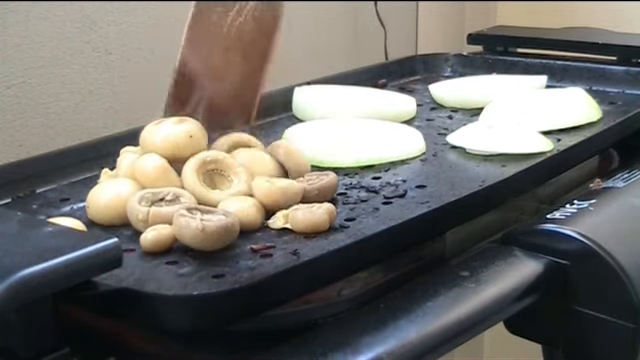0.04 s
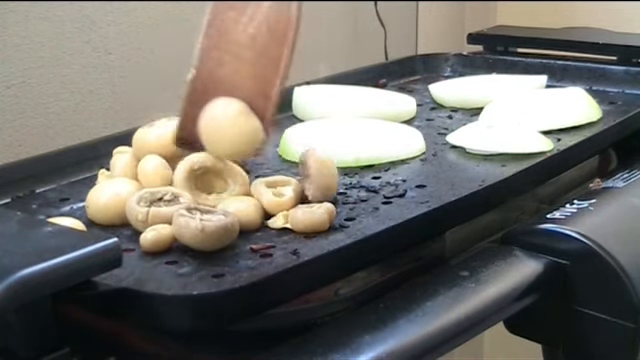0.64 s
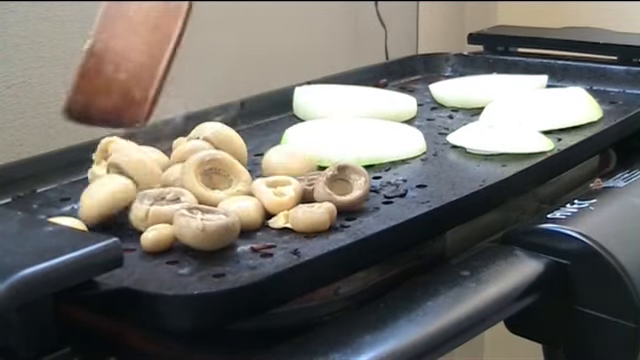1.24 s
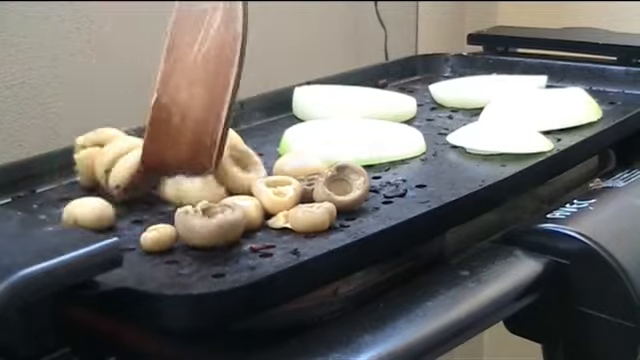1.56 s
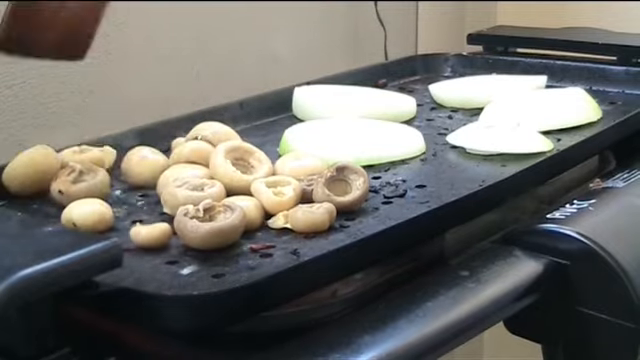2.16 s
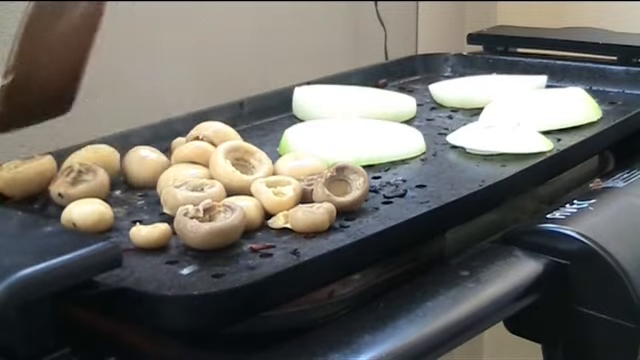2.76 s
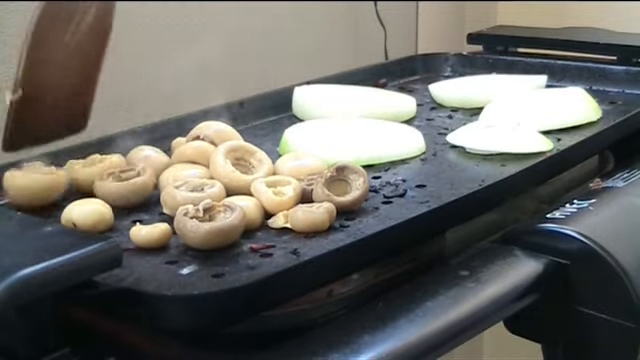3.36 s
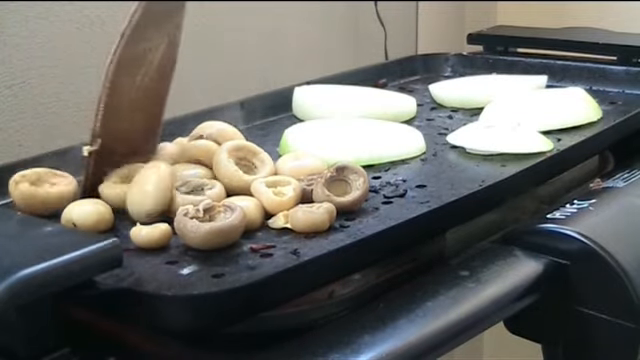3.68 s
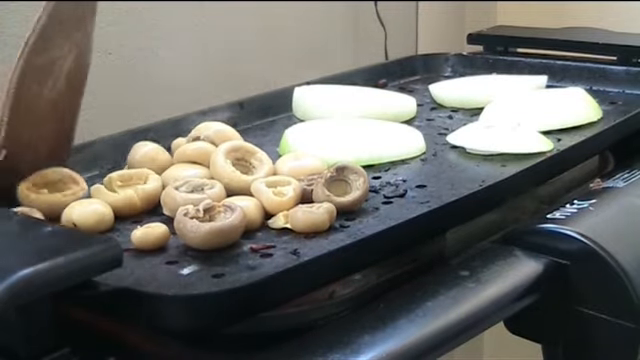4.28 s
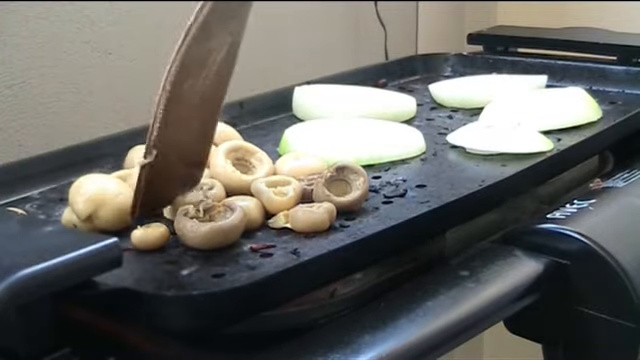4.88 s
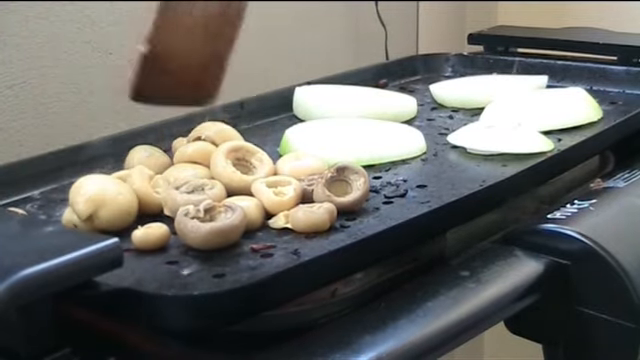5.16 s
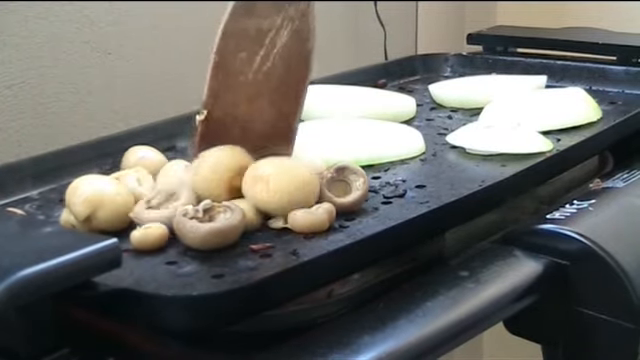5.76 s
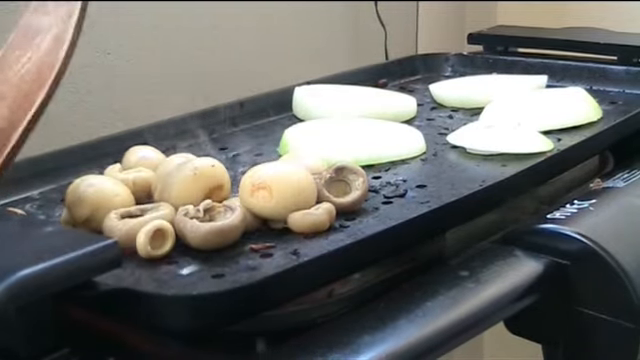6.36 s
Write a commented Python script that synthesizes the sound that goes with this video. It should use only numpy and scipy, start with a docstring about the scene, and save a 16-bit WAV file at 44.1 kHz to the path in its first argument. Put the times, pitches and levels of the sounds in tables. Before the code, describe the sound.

A wooden spatula bumps and shifts frying mushrooms, setting off steamy hisses, brief squeals and tiny pops over a steady sizzle.

```python
"""Mushrooms on the griddle

Mushrooms fry on an electric griddle in a humming kitchen while a wooden spatula pushes them about.
Tiny bubbles keep the juice sizzling. Where a wet face meets hot metal, steam spurts out and makes
the flesh flutter and squeal. The spatula knocks dully on the plate, drops pop, and toward the end
one trapped drop chirrs and spits."""
import sys
import numpy as np
from scipy import signal
from scipy.fft import rfft, irfft
from scipy.io import wavfile

SR = 44100
rng = np.random.default_rng(int(sys.argv[2]) if len(sys.argv) > 2 else 0)


def wav_out(sig):
    """Save sig, one row per channel (or a flat mono array), as 16-bit PCM at SR to the path in sys.argv[1]."""
    wavfile.write(sys.argv[1], SR, np.round(np.clip(np.atleast_2d(sig).T, -1, 1) * 32767).astype(np.int16))


N = 287840
TIME = np.arange(N) / SR
CUTOFF_HZ = 15850
USUAL_SQUEAL_DB = -20  # louder squeals turn brighter, softer ones duller


def from_db(db):
    """Decibels to gain."""
    return 10 ** (np.asarray(db) / 20)


def unit_power(x):
    """Scale to a power of 1."""
    return x / np.sqrt(np.mean(x ** 2) + 1e-20)


def at_hz(points, hz):
    """Read a curve on a log-frequency axis."""
    points_hz, values = np.transpose(points)
    return np.interp(np.log(hz), np.log(points_hz), values)


def add(out, start_s, sound):
    """Mix a sound in from start_s."""
    at = int(start_s * SR)
    out[..., at:at + sound.shape[-1]] += sound[..., :N - at]


def cut(x, hz, kind, order=2):
    """Butterworth filter."""
    sos = signal.butter(order, np.clip(hz, 10, .45 * SR), kind, fs=SR, output="sos")
    return signal.sosfilt(sos, x + 1e-18)


def resonance(x, hz, width_hz):
    """Two-pole resonance with a gain of 1 at its peak."""
    r = np.exp(-np.pi * width_hz / SR)
    gain = (1 - r * r) / 2
    return signal.lfilter([gain, 0, -gain], [1, -2 * r * np.cos(2 * np.pi * hz / SR), r * r], x + 1e-18)


def split_bands(x, edges_hz):
    """Split a sound into bands, lowest first, that add up to it again."""
    below = [signal.sosfiltfilt(signal.butter(4, hz, fs=SR, output="sos"), x) for hz in edges_hz]
    return np.diff([0 * x, *below, x], axis=0)


def drift(per_s, size=N):
    """Random wander with a spread of 1 that changes course per_s times a second."""
    knots = rng.standard_normal(N // 4)
    return np.interp(np.arange(size) * per_s / SR, np.arange(len(knots)), knots) * np.sqrt(3 / 2)


def swell(t, rise_s, length_s, attack_power=1, release_power=0.4):
    """Envelope that climbs to 1 in rise_s and is back at 0 by length_s."""
    attack = np.clip(t / rise_s, 0, 1)
    release = np.clip((length_s - t) / max(length_s - rise_s, 1e-3), 0, 1)
    return attack ** attack_power * release ** release_power


def grains(per_s, spread_db):
    """Two unrelated streams of tiny bursts of uneven size."""
    sizes = from_db(spread_db * np.minimum(rng.exponential(1, (2, N)), 4))
    return sizes * rng.standard_normal((2, N)) * (rng.random((2, N)) < per_s / SR)


def coloured(streams, spectrum):
    """Shape two noise streams into stereo of power 1, narrow in the mids and wide at both ends."""
    # how alike left and right are: frequency_hz, likeness (0 to 1)
    likeness = [(60, 0.38), (500, 0.83), (2000, 0.93), (8000, 0.71), (13000, 0.21)]
    hz = np.maximum(np.arange(N // 2 + 1) * SR / N, 1)
    mid, side = rfft(streams) * from_db(at_hz(spectrum, hz))
    alike = at_hz(likeness, hz)
    return unit_power(irfft(np.sqrt(1 + alike) * mid + np.sqrt(1 - alike) * side * [[1], [-1]], N))


def sizzle(flicker_db=1.0):
    """Thousands of tiny bubbles burst each second in the juice; each size range flickers by itself."""
    # tone of the bursting bubbles: frequency_hz, level_db
    spectrum = [(1000, -10.5), (1700, -9), (2700, -7), (3600, -4.5), (5000, -5), (5800, -1), (7600, -0.5),
                (9000, -2), (10000, -1), (12500, -3), (14000, -4.5), (16000, -9.5)]
    # how hard the juice sizzles: time_s, level_db
    heat = [(0, -28.5), (2.1, -29), (4.1, -29), (5.1, -30.5), (5.6, -27), (6.53, -30)]
    fizz = coloured(grains(per_s=16000, spread_db=-2.0), spectrum)
    bands = split_bands(fizz, edges_hz=[3000, 5500, 8500, 12000])
    level = from_db(np.interp(TIME, *np.transpose(heat)))
    return level * sum(band * from_db(flicker_db * drift(50)) for band in bands)


def kitchen(rush_db=-43.0, waver_rad=0.74):
    """The kitchen's appliances lay down a soft rush and a wavering hum."""
    # tone of the rush: frequency_hz, level_db
    spectrum = [(22, -27), (40, -37), (62, 1), (82, -7.5), (140, -5), (300, -2.5), (750, -2.5), (1100, -6),
                (1700, -21), (4000, -53)]
    # appliance hum: pitch_hz, level_db
    tones = [(206, -53), (242, -55)]
    rush = coloured(rng.standard_normal((2, N)), spectrum)
    hum = sum(from_db(db) * np.sqrt(2) * np.sin(2 * np.pi * hz * TIME + waver_rad * drift(20))
              for hz, db in tones)
    return from_db(rush_db) * rush + hum


def blow(lowpass_hz, boom_db, plate_db=-13, frame_t60_at_1khz_s=0.2, damping_power=0.81):
    """A soft blow rings the plate's main modes and the dense, quickly dying ones of its frame."""
    # tone of the frame's thud: frequency_hz, level_db
    thud = [(150, -12), (310, -15), (420, 3.5), (750, -0.5), (1000, -1), (2000, -0.5), (3200, -1),
            (6000, -25)]
    # modes of the griddle plate: pitch_hz, level_db, t60_s
    modes = [(384, 1.5, 0.18), (484, 5.5, 0.13), (723, 10, 0.067), (1010, -20, 0.052)]
    t = np.arange(SR // 2) / SR
    edges_hz = np.geomspace(140, 6400, 12)
    frame = 0
    for low, high in zip(edges_hz, edges_hz[1:]):
        hz = np.sqrt(low * high)
        t60 = frame_t60_at_1khz_s * (1000 / hz) ** damping_power
        band = cut(rng.standard_normal(len(t)), [low, high], "band")
        frame = frame + band * from_db(at_hz(thud, hz) - 60 * t / t60)
    frame /= np.std(frame[:SR // 100])
    lowest, *upper = [from_db(db - 60 * t / t60) * np.sin(2 * np.pi * hz * t) for hz, db, t60 in modes]
    plate = from_db(boom_db) * lowest + sum(mode * rng.choice([-1, 1]) for mode in upper)
    return cut(frame + from_db(plate_db) * plate, lowpass_hz, "low")


def knocks(rebound_s=0.00554, rebound_db=-4, rebound_brightness=0.33):
    """Spatula and mushrooms bump the plate; each bump lands a second time, weaker and duller."""
    # bumps: start_s, level_db, lowpass_hz (lower for a softer contact), boom_db (on the lowest mode)
    bumps = [(.126, -20.5, 2340, -0.5), (.238, -30, 900, -6), (1.885, -29.5, 900, -9), (2.81, -32, 700, 7),
             (3.427, -27.5, 905, -8), (5.205, -17.5, 3620, -13), (5.241, -23.5, 1200, -13),
             (6.241, -22, 3800, 11)]
    out = np.zeros(N)
    for start_s, db, lowpass_hz, boom_db in bumps:
        add(out, start_s, from_db(db) * blow(lowpass_hz, boom_db))
        rebound = blow(rebound_brightness * lowpass_hz, boom_db)
        add(out, start_s + rebound_s, from_db(db + rebound_db) * rebound)
    return out


def flutter(rise_s, length_s, first_hz, settled_hz, jitter, db_per_octave,
            glide_share=.23, shimmer=6, rolloff_hz=8000, rasp=9, rasp_hz=7000):
    """Steam lifts the flesh off the plate in quick puffs; their rate glides as the contact settles."""
    t = np.arange(int(length_s * SR)) / SR
    pitch = settled_hz + (first_hz - settled_hz) * np.exp(-t / (glide_share * length_s))
    pitch *= 1 + jitter * (drift(1105.7, len(t)) + .5 * drift(152.4, len(t)))
    phase = 2 * np.pi * np.cumsum(pitch) / SR
    harmonics = np.arange(1, 10)[:, None]
    gains = from_db(db_per_octave * np.log2(harmonics)) / (1 + (harmonics * settled_hz / rolloff_hz) ** 4)
    puffs = (gains * (harmonics * pitch < CUTOFF_HZ) * np.sin(harmonics * phase)).sum(axis=0)
    puffs *= 1 + shimmer * jitter * drift(698, len(t))
    # every puff hisses above the pitch, the more so the rougher the flutter is
    hiss = rng.standard_normal(len(t)) * (1 + np.sin(phase))
    hiss = cut(cut(hiss, settled_hz, "high", order=4), rasp_hz, "low")
    return swell(t, rise_s, length_s) * unit_power(unit_power(puffs) + rasp * jitter * unit_power(hiss))


def pressed_face(rise_s, length_s, hz, db, jitter, abrupt_below_s=0.041):
    """A wet face squeals, starting sharp and sagging to its pitch; abrupt and loud ones are brighter."""
    abruptness = 1 / (1 + (rise_s / abrupt_below_s) ** 2)
    sag_hz = 460.4 * (1500.5 / hz) ** .8  # low squeals sag further
    db_per_octave = -6 + 4 * abruptness + 0.3 * (db - USUAL_SQUEAL_DB)
    return from_db(db) * flutter(rise_s, length_s, hz + sag_hz, hz, jitter, db_per_octave)


def squeals(bite_hz=6700, hollow_hz=5100, width_hz=1300, colour_mix_db=-6):
    """The foreground squeals and whistles; like the steam, they have a hollow and a treble bite."""
    # wet faces pressed on the hot plate:
    # start_s, rise_s, length_s, settled_hz, level_db, jitter (share of the pitch)
    contacts = [ (0.187, 0.0057, 0.024, 2404, -23, .1), (0.216, .002, .025, 2398, -18, 0.044),
                (.38, 0.0049, 0.027, 1457, -29, 0.069), (0.528, 0.047, .065, 2158, -25, 0.068),
                (0.582, 0.0064, 0.065, 1630, -29, 0.064), (0.874, 0.0071, 0.031, 2965, -18, 0.072),
                (1.043, .004, 0.062, 1276, -28.5, 0.048), (1.106, 0.041, 0.089, 1406, -27, 0.094),
                (1.371, 0.026, 0.055, 3990, -14, 0.059), (1.473, 0.032, 0.1, 1701, -19.5, .06),
                (1.64, .022, .1, 1081, -23, 0.093), (1.747, 0.0074, 0.021, 1658, -19.5, 0.034),
                (1.78, 0.02, .048, 1422, -21.5, .045), (1.805, 0.004, 0.033, 2510, -17.5, 0.031),
                (2.294, 0.0023, 0.061, 1554, -21, 0.16), (2.344, 0.0081, 0.059, 916, -15.5, .035),
                (2.371, 0.02, .062, 1642, -16.5, 0.041), (2.468, .053, 0.19, 1498, -26.5, 0.087),
                (2.843, 0.0073, 0.024, 1576, -11.5, 0.031), (2.89, .0015, 0.053, 1095, -15.5, 0.033),
                (2.916, 0.016, 0.089, 862, -18.5, 0.032), (3.109, .002, 0.032, 1610, -16.5, 0.035),
                (3.209, .04, 0.07, 1166, -24, 0.036), (3.503, .012, 0.063, 1650, -25, 0.0795),
                (3.624, .01, 0.0324, 1720, -22.5, 0.06), (3.655, 0.0085, 0.019, 1970, -19, .05),
                (3.679, .02, 0.37, 2168, -37.5, 0.096), (4.219, 0.0048, .09, 870.6, -18, 0.0424),
                (4.323, 0.015, 0.13, 1501, -27.5, 0.043), (4.715, .03, 0.046, 2490, -27, 0.056),
                (5.26, 0.015, .045, 3025, -23, 0.062), (5.47, .003, 0.019, 4450, -15, 0.1),
                (5.682, 0.015, 0.047, 2315, -29, 0.022), (5.793, 0.015, 0.079, 1202, -28.5, 0.069)]
    # steam whistling cleanly through a narrow gap: start_s, length_s, pitch_hz, level_db
    whistles = [(1.488, 0.052, 3445, -18), (2.935, 0.077, 3590, -20), (3.245, 0.021, 2390, -20)]
    out = np.zeros(N)
    for start_s, *contact in contacts:
        add(out, start_s, pressed_face(*contact))
    for start_s, length_s, hz, db in whistles:
        whistle = flutter(.011, length_s, hz, hz, jitter=0.0048, db_per_octave=-22)
        add(out, start_s, from_db(db) * whistle)
    colour = resonance(out, bite_hz, width_hz) - resonance(out, hollow_hz, width_hz)
    return out + from_db(colour_mix_db) * colour


def steam_flow():
    """Steam swells and dies away with each push: curves of its strength and of its splutter in dB."""
    # spatula pushes: start_s, rise_s, length_s, level_db, splutter_db (on the big, low bubbles)
    pushes = [(0.864, 0.014, 0.62, -28.5, -14), (1.35, 0.3, 0.67, -22.5, -6),
              (2.297, 0.048, 0.52, -24, 4.5), (2.885, 0.019, 0.21, -24.5, 1), (3.106, .15, 0.19, -22, 3.5),
              (3.492, 0.0046, 0.14, -22, 1), (3.6, 0.063, 0.29, -28, -5), (4.218, 0.017, 0.45, -29.5, 7.5),
              (5.238, 0.04, 1, -31, -19)]
    flow, splutter_db = np.zeros(N), np.zeros(N)
    for start_s, rise_s, length_s, db, push_splutter_db in pushes:
        flow += from_db(db) * swell(TIME - start_s, rise_s, length_s, attack_power=.87, release_power=1.46)
        splutter_db[TIME >= start_s] = push_splutter_db
    return flow, splutter_db


def steam(flow, splutter_db, flicker_db=3.5, band_flicker_db=2, medium_share=0.23):
    """Wet faces spurt steam; a harder press splutters with bigger, lower bubbles."""
    # tone of the spurts: frequency_hz, level_db
    spectrum = [(450, -15), (900, -2), (1700, 3.5), (3000, 0), (5000, 1.5), (6800, 5), (9000, -2.5),
                (12500, -3.5), (16000, -15)]
    spurts = coloured(grains(per_s=8000, spread_db=-0.5), spectrum)
    bands = split_bands(spurts, edges_hz=[1200, 2000, 3200, 5000, 7500, 11000])
    big, medium, *small = [band * from_db(band_flicker_db * drift(90)) for band in bands]
    hiss = big * from_db(splutter_db) + medium * from_db(medium_share * splutter_db) + sum(small)
    return flow * from_db(flicker_db * drift(110)) * hiss


def faint_squeals(flow, per_s=18, low_hz=2003, high_hz=3796, over_flow_db=1.5):
    """Jostled neighbours squeal too, at random moments and pitches, as strongly as the steam flows."""
    out = np.zeros(N)
    for slot, (when, height, span) in enumerate(rng.random((int(per_s * TIME[-1]), 3))):
        hz = low_hz * (high_hz / low_hz) ** height
        squeal = pressed_face(rise_s=.008, length_s=.0321 * (.5 + span), hz=hz,
                              db=USUAL_SQUEAL_DB, jitter=.018)
        add(out, (slot + when) / per_s, squeal)
    return from_db(over_flow_db - USUAL_SQUEAL_DB) * flow * out


def peeps(flow, count=420, over_flow_db=-5):
    """Small wet patches whistle for an instant while the steam flows, mostly falling in pitch."""
    out = np.zeros(N)
    for when, height, span, fall, strength in rng.random((count, 5)):
        start_s, length_s, end_hz = when * TIME[-1], .008 + .02 * span, 1700 * 5 ** height
        progress = np.linspace(0, 1, int(length_s * SR))
        pitch = end_hz * (1 + .16 * (fall - .3) * (1 - progress))
        gain = flow[int(start_s * SR)] * from_db(over_flow_db) * 2 * strength
        add(out, start_s, gain * np.sin(np.pi * progress) * np.sin(2 * np.pi * np.cumsum(pitch) / SR))
    return out


def pops(decay_s=0.0032, band_hz=(900, 8500), trim_db=-2):
    """Drops burst, each with a sharp crack a few milliseconds long."""
    # bursting drops: start_s, level_db
    drops = [(1.595, -5), (1.678, -3), (1.811, -6), (3.167, -3.5), (3.281, -3), (3.378, -6), (3.4933, -2.5),
             (4.268, -10)]
    out, t = np.zeros(N), np.arange(SR // 50) / SR
    for start_s, db in drops:
        crack = cut(rng.standard_normal(len(t)) * np.exp(-t / decay_s), band_hz, "band")
        add(out, start_s, from_db(db + trim_db) * crack / np.abs(crack).max())
    return out


def chirr(start_s=5.64, rise_s=0.029, level_db=-35.5, fade_db_per_s=9,
          pocket_hz=3080, width_hz=420, ticks_per_s=350, spit_decay_s=0.00072):
    """A drop under a mushroom ticks unevenly into one small steam pocket, spits and slowly dries up."""
    # spits that ping the pocket: start_s, peak_db
    spits = [(5.865, -9), (6.131, -13.5), (6.362, -8.5)]
    ticks = (rng.random(N) < ticks_per_s / SR) * rng.uniform(0.32, 1, N)
    pocket = resonance(resonance(ticks, pocket_hz, width_hz), pocket_hz, 2 * width_hz)
    age = np.maximum(TIME - start_s, 0)
    out = unit_power(pocket) * np.minimum(age / rise_s, 1) * from_db(level_db - fade_db_per_s * age)
    t = np.arange(SR // 50) / SR
    ping = np.exp(-t / spit_decay_s) * np.sin(2 * np.pi * pocket_hz * t)
    for spit_s, db in spits:
        add(out, spit_s, from_db(db) * ping)
    return out


def room(x, t60_s=0.44, wet_db=-4, wall_hz=5860, width=0.53, alike_below_hz=700):
    """Diffuse, slightly dull echoes of the nearby walls; long waves reach both channels alike."""
    t = np.arange(SR // 2) / SR
    decay = from_db(-60 * t / t60_s) * (t > .002)
    mid, side = cut(rng.standard_normal((2, len(t))), wall_hz, "low", order=1) * decay
    echoes = mid + width * cut(side, alike_below_hz, "high", order=1) * [[1], [-1]]
    echoes /= np.sqrt(np.sum(echoes ** 2))
    return from_db(wet_db) * signal.fftconvolve(x[None], echoes, axes=1)[:, :N]


def scene(mushroom_pan_db=(0.7, -0.7), sizzle_pan_db=(0.16, -0.16)):
    """The mushrooms lie a little to the left; the sizzle comes from the whole plate."""
    flow, splutter_db = steam_flow()
    spurts, thuds = steam(flow, splutter_db), knocks()
    details = squeals() + faint_squeals(flow) + peeps(flow) + pops() + chirr()
    echoes = room(details + thuds + spurts.mean(axis=0))
    mushrooms = (details + spurts + echoes) * from_db(mushroom_pan_db)[:, None]
    juice = sizzle() * from_db(sizzle_pan_db)[:, None]
    return mushrooms + thuds + juice + kitchen()


def record(dry, ceiling=1.24):
    """Soft clipping rounds the highest peaks, and a steep low-pass cuts the very top."""
    rounded = ceiling * np.tanh(dry / ceiling)
    return signal.sosfilt(signal.ellip(10, .2, 80, CUTOFF_HZ, fs=SR, output="sos"), rounded)


dry = scene()
out = record(dry)
wav_out(out)
```